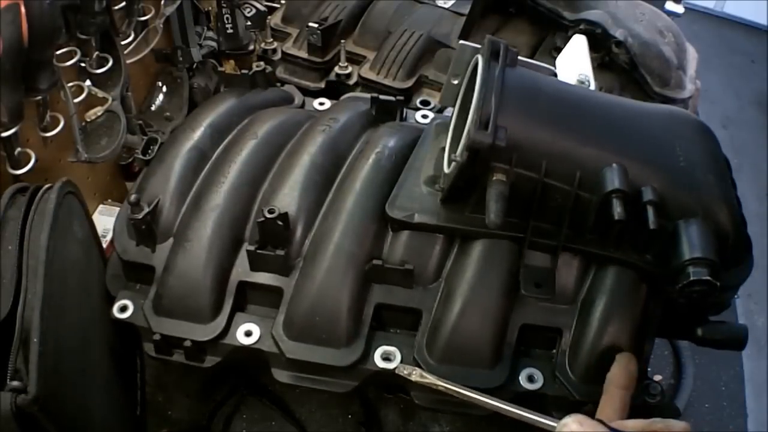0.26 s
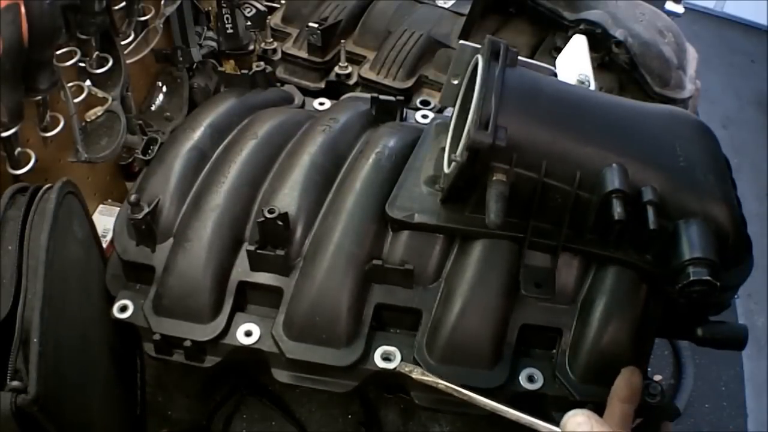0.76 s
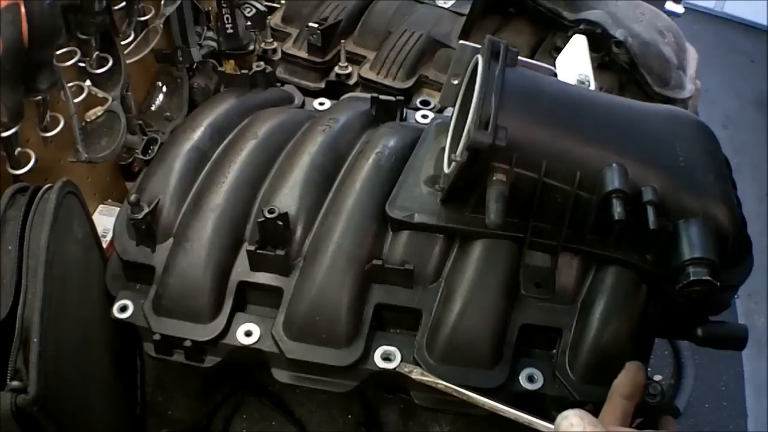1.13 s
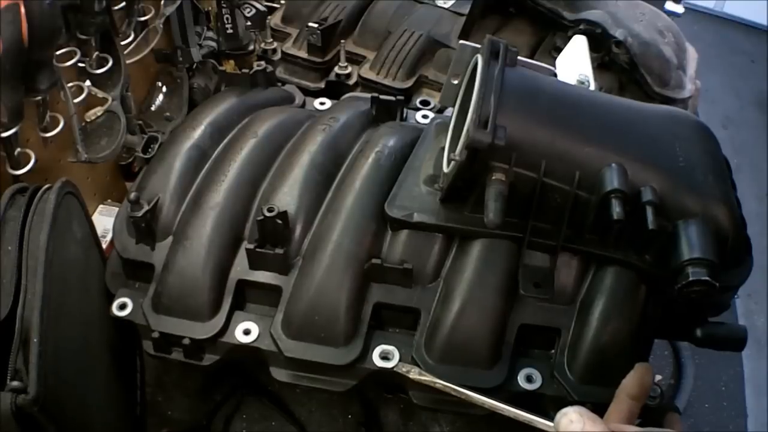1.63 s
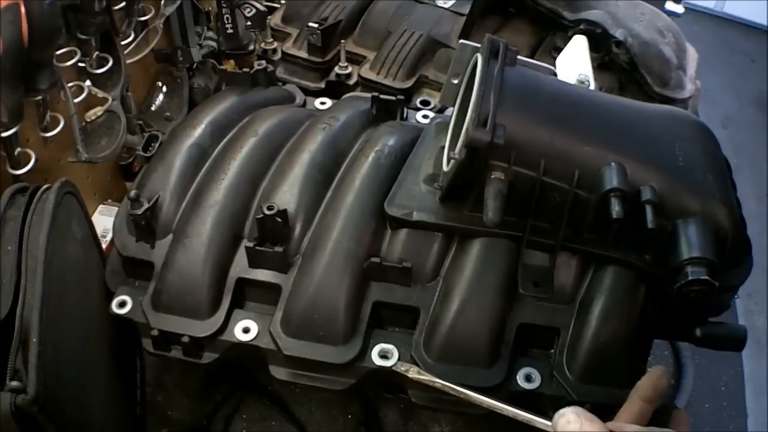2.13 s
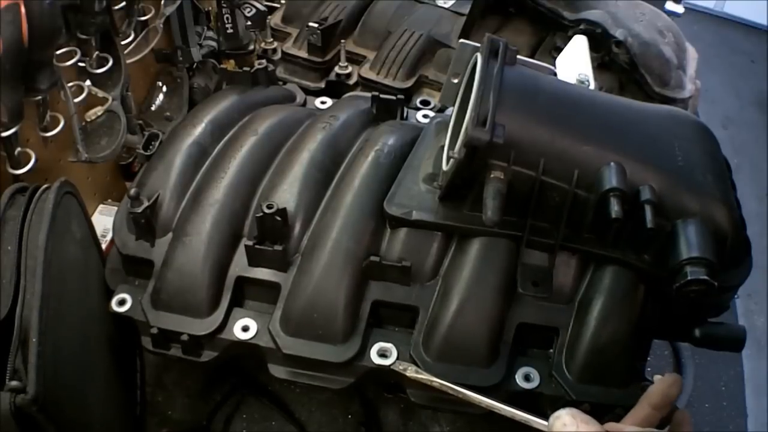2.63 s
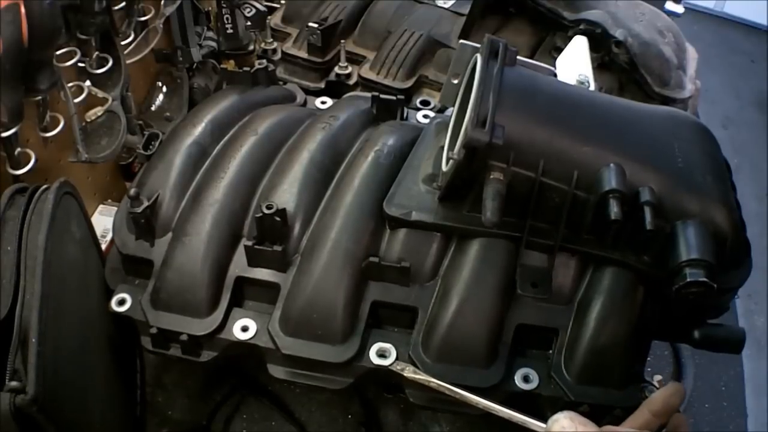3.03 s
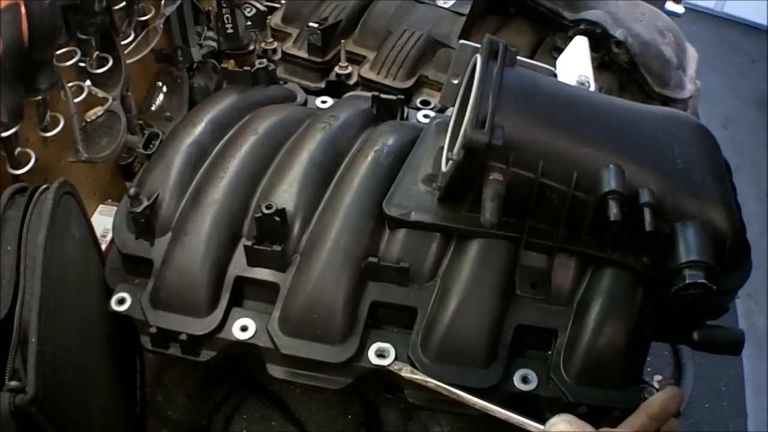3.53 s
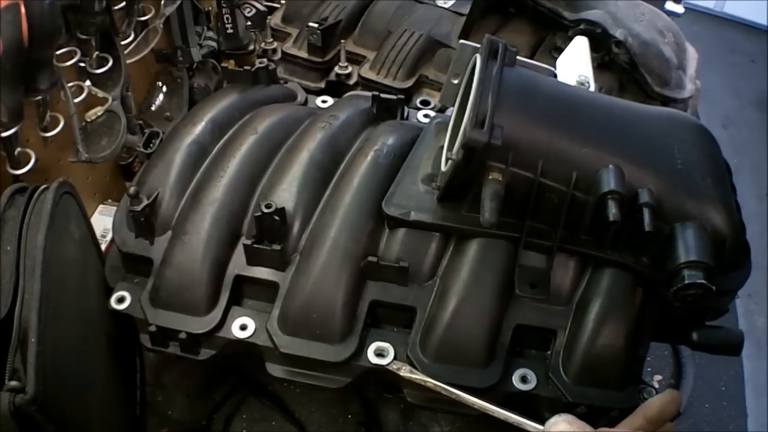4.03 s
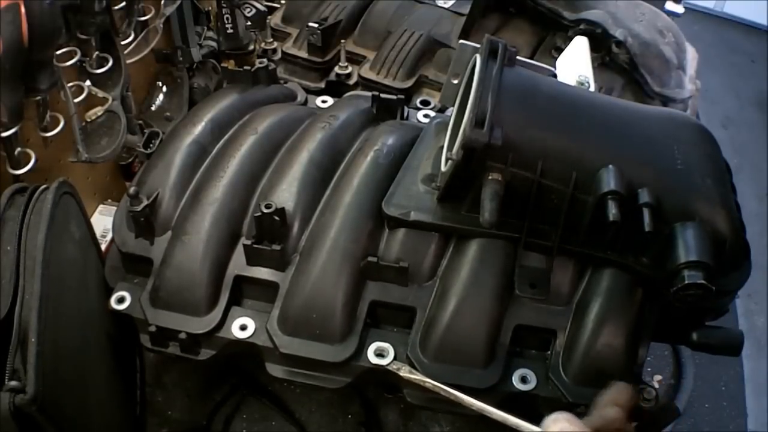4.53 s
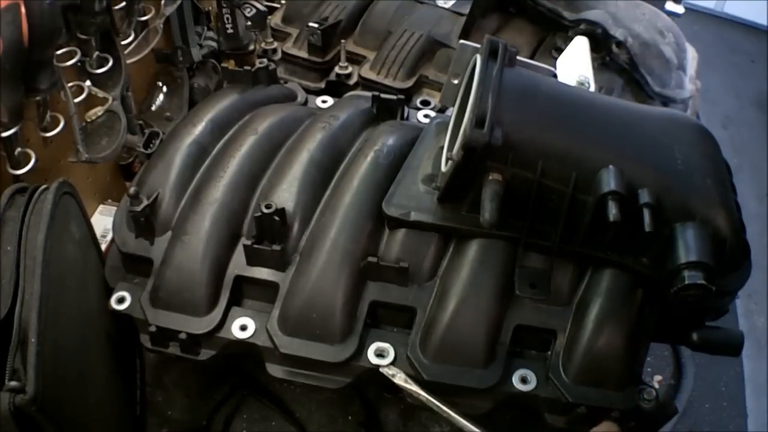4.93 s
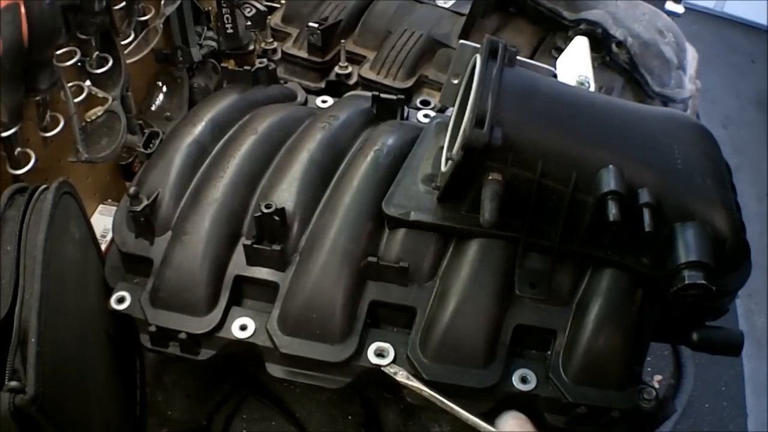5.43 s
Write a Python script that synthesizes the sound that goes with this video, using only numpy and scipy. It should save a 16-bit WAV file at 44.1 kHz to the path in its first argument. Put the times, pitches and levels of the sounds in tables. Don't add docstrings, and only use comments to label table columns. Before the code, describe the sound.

Hard knocks of a screwdriver against a hollow plastic engine part, with light taps, brief scrapes and bench rumble over low hum and hiss.

```python
import sys
import numpy as np
from scipy import signal
from scipy.fft import rfft, irfft
from scipy.io import wavfile
from scipy.ndimage import uniform_filter1d

SR = 44100
rng = np.random.default_rng(int(sys.argv[2]) if len(sys.argv) > 2 else 0)


def convert_level_to_amplitude(level_db):
    exponent = np.asarray(level_db, float) / 20
    return 10 ** exponent


def inscribe(sig):
    pcm = np.round(np.clip(np.atleast_2d(sig).T, -1, 1) * 32767)
    wavfile.write(sys.argv[1], SR, pcm.astype(np.int16))


N = 250484
BURST_N = 2048


def evened(x):
    return x / np.sqrt(np.mean(x ** 2) + 1e-20)


def read(points, hz):
    f, value = np.transpose(points)
    return np.interp(np.log(hz + 1), np.log(f + 1), value)


def ring(modes, force, low_hz=20.0, rise_s=0.000065):
    t = np.arange(SR // 2) / SR
    body = sum(convert_level_to_amplitude(db - 60 * t / t60_s) * np.sin(2 * np.pi * hz * t) for hz, db, t60_s in modes)
    body *= (1 - np.exp(-t / rise_s)) ** 2
    body = signal.sosfilt(signal.butter(4, low_hz, "highpass", fs=SR, output="sos"), body)
    return signal.oaconvolve(force, body / np.linalg.norm(body))[:N]


# [freq_hz, density_db_per_hz]
HISS = [(20, -8.5), (42, -0.5), (57, 9), (72, -2), (120, -13), (200, -14.5), (600, -26.5), (2000, -34.5),
        (5000, -38.5), (7000, -41.5), (11000, -40.5), (15400, -38.5), (15700, -79.5)]


def hiss():
    hiss_db, patch_db, tick_db, mains_hz = -49, 0.37, -50, 59.9
    frames, hz = N // 512 + 6, np.fft.rfftfreq(2048, 1 / SR)
    a, b, patches = rng.standard_normal((frames, 1025, 3)).T
    patches = evened(uniform_filter1d(uniform_filter1d(patches, 16, 0), 6, 1))
    spectra = (a + 1j * b) * convert_level_to_amplitude(read(HISS, hz)[:, None] + patch_db * patches)
    air = signal.istft(spectra, nperseg=2048, noverlap=1536)[1]
    ticks = np.diff(np.floor(np.arange(N + 1) * mains_hz / SR))
    return convert_level_to_amplitude(hiss_db) * evened(air[:N]) + convert_level_to_amplitude(tick_db) * ring([(7400, 0, .003)], ticks)


# [freq_hz, level_db, t60_s]
SHELL = [(1049, -3, 0.11), (1046.6, 12, 0.014), (1271.4, -4.5, 0.11), (1338, 0.5, .04), (1411, 9.5, 0.013),
         (1725, 2, 0.021), (1400, -51, 0.43)]
# [freq_hz, level_db, t60_s]
FLANGE = [(656, -13, 0.02), (800, 0, 0.03), (952, 7, 0.024), (1147.6, -1.5, 0.039), (1353, -7, .025),
          (1618, -3.5, 0.051)]
# [freq_hz, level_db, t60_s]
RIBS = [(1806, -12, 0.089), (2000, 1.5, 0.019), (2137, -1.5, 0.03), (2283, -3, 0.018)]
# [freq_hz, level_db, t60_s]
BENCH = [(102, -17.5, 0.11), (122, -24.5, 0.29), (188, -10.5, 0.04), (294.8, 7.5, 0.016), (402.8, 3, 0.011),
         (493, -13.5, 0.019)]
# [freq_hz, level_db, t60_s]
STEEL = [(3260, 4, 0.0084), (3539, 9, 0.0088), (3791, 2.5, 0.013), (4000, -16.5, 0.028), (4599, -3, 0.017),
         (4787, 9.5, 0.0045), (6020, 1.5, 0.0074), (6380, -6.5, 0.014), (13000, -53.5, .2)]


def parts(shell, flange, bench, ribs, steel, bare):
    plastic = ring(SHELL, shell, 820.0, 0.00041)
    plastic += ring(FLANGE, flange, 550.0, 0.00068)
    plastic += ring(RIBS, ribs, 1600.0, 0.00013)
    hard = ring(BENCH, bench, 49.0, 0.0012) + ring(STEEL, steel, 1770.0, 0.00025)
    return plastic + hard + np.diff(bare, prepend=0)


def stroke(start_s, rise_s, end_s, fade_db_per_s):
    t = np.arange(N) / SR
    return np.clip((t - start_s) / rise_s, 0, 1) * convert_level_to_amplitude(-fade_db_per_s * np.maximum(t - end_s, 0))


# [start_s, length_s, level_db, steel_edge_db]
SCRAPES = [
    (0.0, 0.02, -49, 8),
    (0.898, 0.034, -39.5, -3),
    (1.01, 0.079, -50, -9),
    (1.05, 0.12, -65.5, 13.5),
    (4.49, .08, -47, 5),
    (4.575, 0.13, -30, -15),
    (4.66, 0.14, -58.5, 25),
    (4.803, 0.27, -93.5, 44.5),
    (5.562, .06, -42, 5),
]


def scrapes(slips_per_s=3000):
    rise_share, fade_db_per_s = 0.13, 241
    slips = (rng.random(N) < slips_per_s / SR) * rng.choice([-1., 1.], N)
    slips = evened(slips * convert_level_to_amplitude(4.0 * np.minimum(rng.exponential(1, N), 5)))
    drag = np.zeros((2, N))
    for start_s, length_s, level_db, edge_db in SCRAPES:
        envelope = stroke(start_s, rise_share * length_s, start_s + length_s, fade_db_per_s)
        drag += convert_level_to_amplitude([[level_db - 18.5], [level_db + edge_db - 18.5]]) * envelope
    body, steel = slips * drag
    return parts(body * convert_level_to_amplitude(-8.5), body, body * convert_level_to_amplitude(-4.5), body * convert_level_to_amplitude(-4.0), steel, steel * convert_level_to_amplitude(-11))


def chatter(chance, contact_s):
    u = np.arange(len(chance)) / SR / contact_s
    shape = np.exp(-u) * np.minimum(u / .15 + .1, 1)
    for _ in range(3):
        z = rfft(chance * shape)
        chance = irfft(z / abs(z)) / shape.clip(.15)
    return chance * shape / np.linalg.norm(chance * shape)


def spot(burst, hz, cycles):
    turns = np.arange(len(burst)) * hz / SR
    mode = convert_level_to_amplitude(-60 * turns / cycles) * np.sin(2 * np.pi * turns)
    return signal.fftconvolve(burst, mode / np.linalg.norm(mode))[:len(burst)]


# [start_s, level_db, bench_weight_db, steel_edge_db, spot_hz]
BLOWS = [
    (1.565, -5, -14, -9.5, 1390),
    (2.04, -6.5, -13, -7.5, 1398),
    (2.414, -5.5, -13.5, -7, 1315),
    (3.376, -9.5, -24, -4, 1295),
    (3.65, -8, -14, -7.5, 1317),
    (3.862, -9, -14, -7, 1383),
]
# [start_s, level_db, bench_weight_db, steel_edge_db, spot_hz]
TAPS = [(0.324, -18, -10.5, -14.5, 3330), (0.332, -21, -4.5, -12, 900), (0.42, -19, -17.5, 12, 2193),
        (0.432, -18.5, -18, -10, 2250), (0.929, -29, -7, -10.5, 1546), (1.239, -11, -10.5, -10.5, 1032),
        (1.249, -17, -6, -11.5, 912), (2.774, -6, -4, 10, 4910), (4.62, -15, -17, -2.5, 1554),
        (4.629, -16, -29, 1, 1344), (4.702, -24, -24, -1.5, 3470), (4.707, -30, -19, 1, 2300),
        (4.779, -21.5, -9, -5.5, 1514), (5.025, -25, -19, -5, 1576), (5.328, -39, -4, 1, 3490),
        (5.596, -20.5, -14.5, 5, 1570), (5.601, -22.5, -23, -5, 1670), (5.611, -25, -12.5, -1.5, 1520)]
# [start_s, level_db, bench_weight_db, steel_edge_db, spot_hz]
SLIPS = [(0.009, -54, -14, 9, 3580), (0.839, -39, 2, -5, 800), (1.022, -35.5, -7, -13.5, 1950),
         (4.491, -51, -12, 2.5, 1830), (4.575, -41, -23, 2, 900), (4.59, -38.5, -14, 11, 3380),
         (4.649, -18.5, -17, -7, 1520), (4.665, -22, -26, -6, 3300), (4.685, -23.5, -12, -24, 1450),
         (4.764, -36, -4, -2, 890), (4.786, -32.5, 0, 4, 1580), (4.815, -32.5, 4, 2.5, 1390),
         (4.83, -40, 3, -6.5, 2120), (5.569, -32.5, -14, -9, 1890), (5.583, -24, -18, -5.5, 926)]
# [start_s, level_db, bench_weight_db, steel_edge_db, spot_hz]
TICKS = [
    (4.275, -65, -16, 4.5, 11860),
    (4.29, -64, -10, 5.5, 11800),
    (4.62, -28, -17, 2, 9050),
    (4.799, -51, 12, 6, 10000),
    (4.975, -47, -24, 3, 1850),
    (4.989, -46.5, -16, -8, 1220),
    (5.306, -64, -11.5, 17.5, 6150),
    (5.363, -46.5, -25, 4.5, 2060),
    (5.504, -75, 2, 12, 4000),
]
# [push_db, flange_over_shell_db, ribs_db, bare_crack_db, spot_db]
KINDS = [
    (13, -6, -3, -13, -6),
    (-2, 1, 2, -14.5, -0.5),
    (-4.5, -2, 1.5, -8, 2),
    (-5.5, 26, -4, -19, 13.5),
]
CONTACT_S = (.0032, 0.0055, 0.0096, 0.000787)
SPOT_CYCLES = (33, 68, 48, 13)


def knocks():
    ribs_per_edge, bare_per_edge, bare_per_level = 0.52, 1.3, 0.8
    part_db = [-0.5, -1.5, 3.0, 0.5, 3.0, 7.0]
    force, spots = np.zeros((6, N + BURST_N)), np.zeros(N + BURST_N)
    for rows, kind, contact_s, cycles in zip((BLOWS, TAPS, SLIPS, TICKS), KINDS, CONTACT_S, SPOT_CYCLES):
        push_db, flange_db, ribs_db, bare_db, spot_db = kind
        chances = rng.standard_normal((len(rows), BURST_N))
        for (start_s, level_db, weight_db, edge_db, spot_hz), chance in zip(rows, chances):
            shares_db = np.array([
                min(-flange_db, 0), min(flange_db, 0), weight_db, ribs_db + ribs_per_edge * edge_db, edge_db,
                bare_db + bare_per_edge * edge_db + bare_per_level * level_db])
            burst = convert_level_to_amplitude(level_db + push_db + 17.0) * chatter(chance, contact_s)
            at = round(start_s * SR)
            force[:, at:at + BURST_N] += convert_level_to_amplitude(shares_db + part_db)[:, None] * burst
            spots[at:at + BURST_N] += convert_level_to_amplitude(spot_db) * spot(burst, spot_hz, cycles)
    return parts(*force[:, :N]) + spots[:N]


# [freq_hz, t60_s]
ROOM = [(100, 0.37), (400, 0.26), (1300, 0.35), (4000, 0.32), (8000, 0.23), (15000, 0.15)]
# [from_s, to_s, level_db]
FAR_WALL = (.09, .157, 2.5)


def room(x):
    linger_db, linger_factor, wall_dull_hz = -14, 1.663, 10400
    taps = np.zeros(SR)
    at = np.arange(200, SR - 12, 12) + rng.integers(0, 12, (SR - 201) // 12)
    taps[at] = rng.choice([-1., 1.], len(at))
    from_s, to_s, db = FAR_WALL
    taps *= convert_level_to_amplitude(np.interp(np.arange(SR) / SR, [from_s - .04, from_s, to_s, to_s + 0.021], [0, db, db, 0]))
    hz, t, z = signal.stft(taps, SR, nperseg=256)
    fall_db = 60 * t / read(ROOM, hz)[:, None]
    decay = convert_level_to_amplitude(-fall_db) + convert_level_to_amplitude(linger_db - fall_db / linger_factor)
    tail = signal.istft(z * decay, SR, nperseg=256)[1]
    tail = signal.sosfilt(signal.butter(3, wall_dull_hz, fs=SR, output="sos"), tail)
    return signal.fftconvolve(x, tail / np.linalg.norm(tail))[:N]


# [start_s, level_db, seat_tilt_pitch_factor]
GLANCING = [
    (0.421, -0.5, 1.4),
    (2.775, 21.5, 0.964),
]
# [freq_hz, level_db, t60_s]
SLEEVE = [(800, -11.5, .025), (982, 1.5, 0.018), (1365, -4.5, .03), (1949, -3, .02), (4000, -2, 0.0057),
          (4560, 9, .01), (4820, 2.5, .009)]


def sleeve():
    out = np.zeros(N)
    chances = rng.standard_normal((len(GLANCING), BURST_N))
    for (start_s, level_db, tilt), chance in zip(GLANCING, chances):
        burst = convert_level_to_amplitude(level_db) * chatter(chance, 0.007)
        force = np.pad(burst, (round(start_s * SR), N))[:N]
        modes = [(hz * tilt, db, t60_s) for hz, db, t60_s in SLEEVE]
        out += ring(modes, force, 600.0, 0.0001)
    return out


# [start_s, hold_s, level_db, sway_db]
SHOVE = [
    (4.619, 0.07, -28.5, -4),
    (4.765, 0.056, -27.5, 3),
    (5.028, 0.01, -35, -17),
]
# [from_hz, to_hz, level_db, rise_s, fade_db_per_s]
SHAKEN = [
    (34.7, 62, 3, 0.092, 252),
    (107.6, 138, -2, 0.027, 291),
    (162, 263, -4, 0.0136, 402),
    (470, 558, -8.5, 0.0049, 600),
]


def shove():
    lumps = evened(uniform_filter1d(rng.standard_normal(N), 400))
    friction = rng.standard_normal(N) * convert_level_to_amplitude(2.0 * lumps)
    out = np.zeros(N)
    for k, (from_hz, to_hz, part_db, rise_s, fade_db_per_s) in enumerate(SHAKEN):
        bandpass = signal.butter(2, [from_hz, to_hz], "bandpass", fs=SR, output="sos")
        band = evened(signal.sosfilt(bandpass, friction))
        for start_s, hold_s, level_db, sway_db in SHOVE:
            db = level_db + part_db + sway_db * (k == 0)
            out += band * convert_level_to_amplitude(db) * stroke(start_s, rise_s, start_s + hold_s, fade_db_per_s)
    return out


def scene():
    work = knocks() + scrapes()
    rumble = shove()
    work = work + sleeve()
    return (work + convert_level_to_amplitude(-11.5) * room(work) + rumble)[None]


# [freq_hz, width_hz, depth_db]
DIPS = [(2715, 600, -24), (5512, 450, -14), (8050, 1300, -12), (10900, 500, -18)]


def recorder_colour(x):
    step_hz, top_hz, edge_hz = 5060, 11200.0, 16000
    for hz, width_hz, depth_db in DIPS:
        b, a = signal.iirpeak(hz, hz / width_hz, SR)
        x = x - (1 - convert_level_to_amplitude(depth_db)) * signal.lfilter(b, a, x)
    step = signal.firwin(1501, step_hz, window=("kaiser", 3.0), fs=SR)
    under = signal.oaconvolve(x, step[None], "same")
    top = signal.sosfilt(signal.butter(4, top_hz, "highpass", fs=SR, output="sos"), x)
    x = under + convert_level_to_amplitude(-7.5) * (x - under) + convert_level_to_amplitude(-21.0) * top
    edge = signal.firwin(161, edge_hz, window=("kaiser", 9), fs=SR)
    return signal.oaconvolve(x, edge[None], "same")


def top_cut(x):
    return signal.sosfilt(signal.butter(12, 16720, fs=SR, output="sos"), x)


def record(dry):
    threshold_db, recovery_db_per_s, attack_s, duck_per_db = -28.5, 227.0, 0.0049, 0.67
    level_db = 10 * np.log10(abs(uniform_filter1d(dry[0] ** 2, 131, origin=65)) + 1e-12)
    fall_db = np.arange(N) * recovery_db_per_s / SR
    held_db = np.maximum.accumulate(level_db + fall_db) - fall_db
    over_db = np.maximum(held_db - threshold_db, 0)
    lag = np.exp(-1 / (attack_s * SR))
    ducked = dry / convert_level_to_amplitude(duck_per_db * signal.lfilter([1 - lag], [1, -lag], over_db))
    loaded = 0.73 * np.tanh(ducked / 0.32) + hiss()
    return top_cut(np.clip(recorder_colour(loaded), -1, 1))


dry = scene()
out = record(dry)
inscribe(out)
```